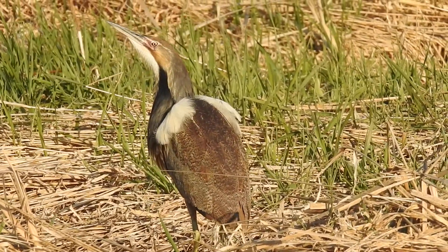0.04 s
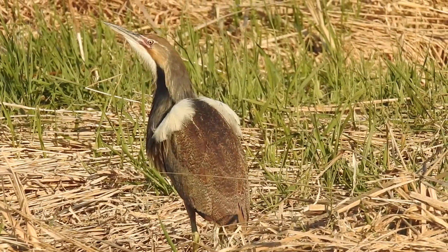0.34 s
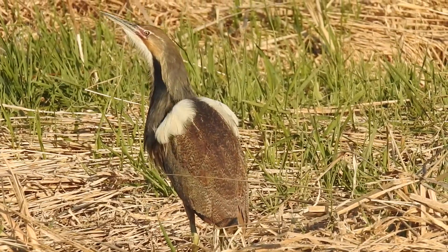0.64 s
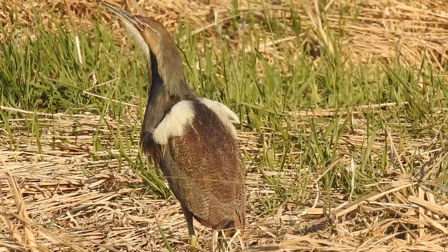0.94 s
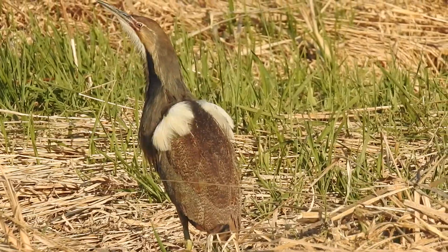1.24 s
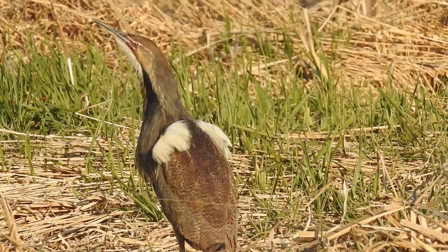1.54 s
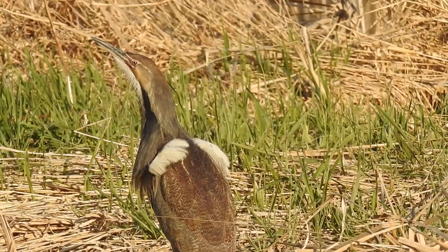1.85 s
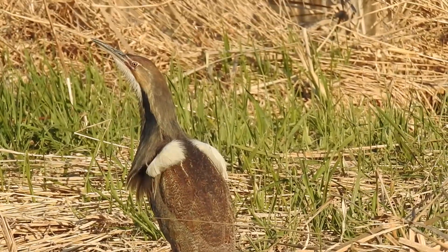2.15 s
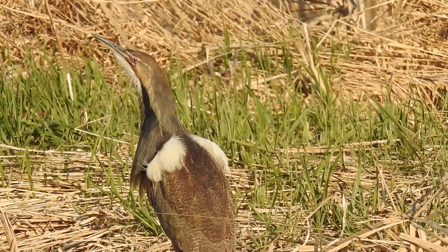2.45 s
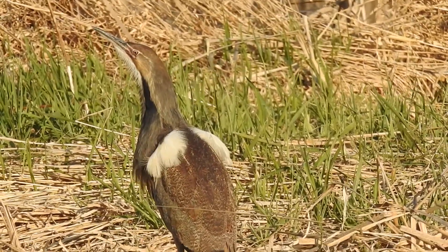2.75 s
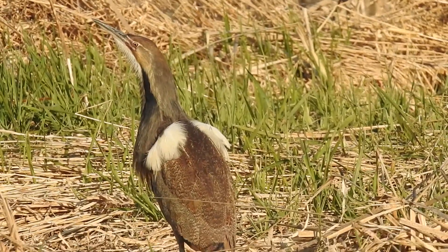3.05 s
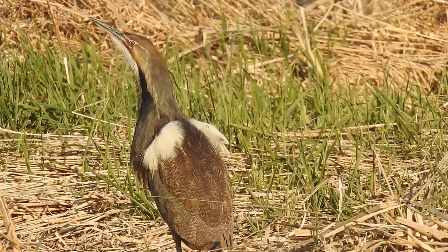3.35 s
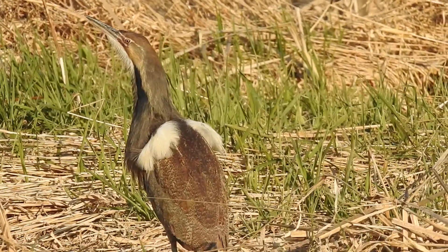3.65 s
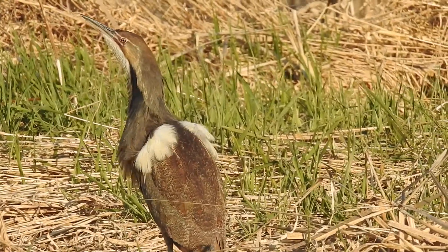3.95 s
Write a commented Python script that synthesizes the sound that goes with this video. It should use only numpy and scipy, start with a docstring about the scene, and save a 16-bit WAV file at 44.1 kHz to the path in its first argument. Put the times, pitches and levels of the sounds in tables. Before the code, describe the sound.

Many small birds chirping and twittering in a marsh, with low gusts of wind.

```python
"""A marsh full of small birds on a breezy day, heard through a stereo microphone.
In the first second wind buffets the microphone. From the outset whistles, chips, buzzes and nasal yelps
overlap above a distant chorus, soon joined by rising chirps: tones of the syrinx, scattered by reeds.
A faint far call throbs early on and again past halfway, when a soft knock sounds; a brief gust follows.
At the end one near bird starts a harsh trill, sounding both sides of its syrinx at once."""
import sys
import numpy as np
from scipy import signal
from scipy.fft import rfft, irfft
from scipy.io import wavfile

SR = 44100
rng = np.random.default_rng(int(sys.argv[2]) if len(sys.argv) > 2 else 0)


def file_out(sig):
    """Save sig as 16-bit WAV at sys.argv[1]."""
    # one column per channel
    cols = np.atleast_2d(sig).T
    # limit, then scale
    lim = np.clip(cols, -1, 1)
    pcm = np.round(lim * 32767).astype(np.int16)
    wavfile.write(sys.argv[1], SR, pcm)


N = 176400


def syrinx(hz, waver, edge=.22, flutter_db=2, waver_per_s=350):
    """Self-sustained oscillation: a near-sine, slightly unsteady in frequency and amplitude."""
    n = len(hz)
    u = np.linspace(0, 1, n)
    envelope = np.sin(np.pi / 2 * np.clip(np.minimum(u, 1 - u) / edge, 0, 1))
    cycles = np.cumsum(hz * (1 + waver * drift(n, waver_per_s))) / SR
    flutter = amp(flutter_db * drift(n, waver_per_s / 2))
    return np.sqrt(2) * envelope * flutter * np.sin(2 * np.pi * cycles)


def slur(length, start_hz, end_hz):
    """Frequency glide: the pitch moves fast at first, then more slowly."""
    done_halfway = .62 if end_hz > start_hz else .56
    return arc(length, start_hz, start_hz + done_halfway * (end_hz - start_hz), end_hz)


def perched_notes(table, waver, wet_db, apart, flutter_db, edge):
    """Superposition: glides come from four perches, each with its own echo paths."""
    perches = np.zeros((4, N))
    for k, (s, length, start, end, db) in enumerate(table):
        add(perches[k % 4], s, amp(db) * syrinx(slur(length, start, end), waver, edge, flutter_db))
    return sum(reeds(x, wet_db, apart) for x in perches)


# Slurred whistles: (time [s], length [s], start [Hz], end [Hz], relative level [dB])
WHISTLE_NOTES = [(0, 0.073, 3430, 3140, -40), (.12, .12, 2932, 2580, -37.5),
                 (.318, 0.026, 4890, 4930, -36.5), (.375, 0.075, 4250, 4220, -43),
                 (.47, .12, 3604, 3165, -40), (.615, 0.1, 2956, 2470, -39), (.87, 0.031, 6380, 6030, -33),
                 (.92, 0.047, 3390, 3110, -41.5), (1.135, .11, 2730, 2550, -50),
                 (1.365, 0.03, 4510, 4580, -38), (1.7, 0.03, 4160, 3974, -38),
                 (2.52, 0.058, 4990, 3860, -35.5), (3.738, 0.028, 5280, 5380, -37.5),
                 (3.92, 0.066, 2754, 2047, -59)]

def whistles():
    """Slow frequency glides: nearly pure tones, most of them falling."""
    return amp(-1.5) * perched_notes(WHISTLE_NOTES, .0071, wet_db=-4.5, apart=.45, flutter_db=2, edge=.15)


# Rising chirps: (time [s], length [s], top [Hz], level [dB])
CHIRP_NOTES = [(.73, 0.046, 5420, -40.5), (1.637, 0.018, 5000, -34.5), (1.756, 0.021, 5080, -36.5),
               (1.935, 0.037, 5060, -39.5), (2.087, 0.045, 4820, -34.5), (2.216, 0.045, 4770, -40),
               (2.301, 0.069, 4610, -42.5), (2.428, 0.071, 4780, -42), (3.013, 0.047, 5860, -39),
               (3.338, 0.068, 4170, -38)]

def chirps(sweep_hz=1350, rise_s=.0065):
    """Exponential approach: one bird's pitch sweeps up and holds its top note."""
    out = np.zeros(N)
    for s, length, top, db in CHIRP_NOTES:
        hz = top - sweep_hz * np.exp(-np.arange(0, length, 1 / SR) / rise_s)
        add(out, s, amp(db) * syrinx(hz, .013, edge=.25, flutter_db=3))
    return reeds(out, wet_db=-2)


# Quick chips: (time [s], length [s], start [Hz], end [Hz], relative level [dB])
CHIP_NOTES = [(0.298, 0.011, 5050, 6500, -35), (0.348, 0.015, 6910, 4740, -34.5),
              (0.832, 0.042, 6230, 4180, -35), (0.843, 0.035, 4820, 3150, -38.5),
              (1.088, 0.017, 5530, 6830, -36.5), (1.233, 0.016, 5110, 6660, -31),
              (1.236, 0.013, 7970, 5380, -33), (1.46, 0.011, 5580, 6930, -34.5),
              (1.485, 0.045, 6500, 7950, -45), (1.612, 0.022, 8000, 5400, -35),
              (1.822, 0.0081, 7500, 6500, -41), (2.0, 0.017, 7100, 5870, -38.5),
              (2.075, 0.011, 3710, 5590, -36.5), (2.2, 0.016, 5800, 6330, -37.5),
              (2.298, 0.01, 5040, 5580, -34.5), (2.358, 0.049, 6150, 6100, -42),
              (2.898, 0.0089, 5870, 6340, -39.5), (3.012, 0.024, 5550, 7000, -42),
              (3.173, 0.011, 7120, 4230, -34), (3.232, 0.02, 5360, 6870, -34),
              (3.246, 0.0045, 6350, 5720, -24), (3.261, 0.016, 6700, 3920, -28.5),
              (3.68, 0.058, 7620, 5530, -41.5), (3.753, 0.0022, 3400, 3570, -24),
              (3.762, 0.0023, 3740, 4060, -26), (3.7715, 0.0022, 4990, 4020, -21.5)]

def chips():
    """Time-bandwidth trade-off: brief, steep glides spread over a wide band."""
    return amp(-3) * perched_notes(CHIP_NOTES, .0232, wet_db=2, apart=1, flutter_db=4, edge=.22)


# Buzzy notes: (time [s], length [s], carrier [Hz], swing [Hz], swing rate [Hz], relative level [dB])
BUZZ_NOTES = [(0.135, 0.13, 5160, 950, 67, -43.5), (0.398, 0.096, 6100, 310, 73, -38),
              (0.529, 0.033, 4710, 630, 123, -36), (0.991, 0.042, 4530, 503, 130, -36.5),
              (1.247, 0.036, 6100, 348, 92, -39), (1.304, 0.035, 4370, 670, 114, -37),
              (1.668, 0.035, 5050, 410, 89, -35.5), (1.725, 0.04, 5100, 510, 110, -38),
              (1.91, 0.022, 4430, 1095, 85, -40.5), (2.009, 0.051, 5180, 920, 90, -37.5),
              (2.112, 0.036, 3926, 710, 111, -38.5), (2.325, 0.027, 5350, 1170, 73, -39.5),
              (2.448, 0.03, 5200, 302, 127, -36.5), (2.476, 0.026, 3745, 484, 104, -38.5),
              (2.792, 0.068, 5056, 277, 135, -32.5), (3.59, 0.044, 5870, 497, 126, -41.5)]

def buzzes():
    """Frequency modulation: about a hundred pitch swings a second give rough sidebands."""
    out = np.zeros(N)
    for s, length, carrier, swing, rate, db in BUZZ_NOTES:
        phase = 2 * np.pi * rate * np.arange(0, length, 1 / SR)
        hz = carrier + swing * np.sin(phase + .5 * np.sin(phase))
        add(out, s, amp(db) * syrinx(hz, waver=.053 * swing / 1000, edge=.4))
    return amp(-3) * reeds(out, wet_db=4.5, apart=.28)


# Nasal yelps: (time [s], length [s], top of the fourth harmonic [Hz], relative level [dB])
YELP_NOTES = [(.01, 0.051, 2796, -45), (0.315, 0.055, 2797, -46.5), (0.8, 0.038, 2747, -46),
              (0.87, 0.035, 2955, -43), (0.969, 0.048, 2980, -40.5), (1.034, 0.087, 2980, -41.5),
              (1.311, 0.041, 2772, -44), (1.402, 0.057, 2790, -46), (1.523, .04, 2820, -49),
              (1.578, 0.06, 2974, -44), (1.761, 0.07, 2840, -45.5), (1.899, 0.048, 2880, -45),
              (1.985, 0.076, 2858, -45.5), (2.11, .04, 2816, -51), (2.32, .045, 2970, -44.5),
              (2.651, 0.049, 2903, -41), (2.694, 0.019, 2666, -43), (2.753, 0.052, 2710, -44.5),
              (2.813, 0.046, 2813, -43.5), (2.906, .045, 2690, -45.5), (2.958, 0.04, 2870, -46),
              (3.071, 0.037, 2932, -41), (3.116, 0.073, 2823, -45), (3.167, 0.042, 2900, -44),
              (3.343, 0.063, 2885, -50.5), (3.475, 0.043, 2942, -38.5), (3.513, 0.055, 2883, -48.5),
              (3.716, 0.037, 2850, -42)]
# Throat response, with gaps between the harmonics: (frequency [Hz], gain [dB])
THROAT_RESPONSE = [(2450, -3.5), (2800, 3.5), (3060, -13.5), (3380, 10.5), (3740, -26.5), (4050, -3)]

def yelps(harmonics_db=(-15.5, 3, -4.5, -8), uneven_db=4):
    """Source and filter: harmonics 3 to 6 of a rising, missing fundamental pass through the throat."""
    source = np.zeros(N)
    chances = rng.uniform(-.963, 1, (len(YELP_NOTES), 5))
    for (s, length, top, db), chance in zip(YELP_NOTES, chances):
        rise = .1 * (1 + .5 * chance[-1])
        fundamental = slur(length, top * (1 - rise), top) / 4
        for k, harmonic_db in enumerate(harmonics_db):
            gain = amp(db - 5.5 + harmonic_db + uneven_db * chance[k])
            add(source, s, gain * syrinx(fundamental * (k + 3), .013))
    return reeds(irfft(rfft(source) * amp(per_bin(THROAT_RESPONSE)), N), wet_db=0)


def trill(start_s=3.784, period_s=.0207, slowing_s=.00012, pulse_s=.0175, shake_hz=450, shakes_per_s=260):
    """Biphonation: in each pulse one side of the syrinx dips in pitch while the other arches and shakes."""
    lows, highs = np.zeros((2, N))
    for k, (detune, size, phase) in enumerate(rng.standard_normal((10, 3))):
        s = start_s + k * (period_s + k * slowing_s)
        low_db = -28 - 5.5 * np.exp(-k / 2) + .5 * size  # swells over the first pulses
        low_hz = arc(pulse_s, 3020, 2835, 2830) * (1 + .01 * detune)
        shake = np.sin(2 * np.pi * (shakes_per_s * np.arange(len(low_hz)) / SR + phase))
        high_hz = arc(pulse_s, 3600, 4750, 3600) + shake_hz * shake
        add(lows, s, amp(low_db) * syrinx(low_hz, .01, edge=.42, flutter_db=1.2, waver_per_s=900))
        add(highs, s, amp(-38.5) * syrinx(high_hz, .05, edge=.45, flutter_db=4, waver_per_s=1500))
    return reeds(lows, wet_db=-12) + reeds(highs, wet_db=-1)


# Gusts on the microphone: (time [s], level [dB])
GUST_LEVELS = [(0, -34.5), (.05, -29.5), (.1, -49.5), (0.171, -32), (.22, -61), (.33, -56), (.45, -38.5),
               (.53, -41.5), (.67, -28), (.75, -38), (.86, -30), (.98, -53), (1.1, -37.5), (1.19, -51),
               (1.5, -59), (2.14, -52), (2.25, -87), (3.02, -52.5), (3.111, -32), (3.16, -57)]
# Wind spectrum: (frequency [Hz], relative level [dB])
WIND_SPECTRUM = [(20, -25), (45, -2), (100, 2), (190, -14.5), (330, -62), (900, -82)]

def wind():
    """Turbulent pressure: low noise, uncorrelated at the two ports and stronger on the left."""
    level_db = np.interp(np.arange(N) / SR, *np.transpose(GUST_LEVELS)) + drift(N, 45)
    return amp(level_db) * colour(rng.standard_normal((2, N)), WIND_SPECTRUM) * amp([[1.6], [-1.6]])


def knock(peak_s=2.671, hz=183, width_s=.0061):
    """A transient: a soft low tone and a little scuff rise and decay exponentially."""
    t = np.arange(N) / SR - peak_s
    tone = amp(-31.5) * np.cos(2 * np.pi * hz * t)
    scuff = amp(-41.5) * colour(rng.standard_normal(N), [(1000, 0), (2500, -30), (8000, -60)])
    return np.exp(-abs(t) / width_s) * (tone + scuff)


# Low, distant whistles: (time [s], length [s], start [Hz], end [Hz], direct level [dB])
FAR_WHISTLE_NOTES = [(1.27, 0.078, 2360, 1885, -60.5), (2.985, 0.088, 2110, 1760, -57),
                     (3.385, 0.11, 2218, 2006, -52), (3.5, 0.04, 1773, 1864, -49),
                     (3.555, 0.039, 1510, 1525, -54.5), (3.716, .014, 1600, 1480, -48),
                     (3.86, 0.054, 2185, 2055, -54.5)]

def far_whistles():
    """Beyond the critical distance: a far bird's echo outweighs its direct sound."""
    return perched_notes(FAR_WHISTLE_NOTES, .03, wet_db=4, apart=.4, flutter_db=4, edge=.25)


# Spectrum of the distant chorus: (frequency [Hz], relative level [dB])
CHORUS_SPECTRUM = [(1700, 9.5), (2400, -15.5), (2750, -0.5), (3050, -1), (4200, 0.5), (6300, -7),
                   (7500, -11)]

def chorus(notes_per_s=160, spread_db=8, max_glide=.159):
    """Incoherent summation: random short slurs of many far birds merge, mostly as echo."""
    out = np.zeros(N)
    for when, pitch, length, slope, size in rng.random((int(notes_per_s * N / SR), 5)):
        start_hz = 2200 * 3.3 ** pitch
        end_hz = start_hz * (1 + max_glide * (2 * slope - 1))
        hz = slur(.012 + .04 * length, start_hz, end_hz)
        add(out, when * N / SR, amp(spread_db * size) * syrinx(hz, .0232))
    return amp(-45.5) * colour(reeds(out, wet_db=4.5), CHORUS_SPECTRUM)


# Faint drawn-out calls: (time [s], length [s])
FAR_CALL_SPANS = [(0.279, 0.57), (2.448, 0.55)]

def far_calls(hz=1176, throbs_per_s=11):
    """Amplitude modulation: a far-off level tone and the rasp around it throb together."""
    out = np.zeros(N)
    rasp = colour(rng.standard_normal(N), [(250, -25), (600, -2), (1250, 0), (1800, -25)])
    for s, length in FAR_CALL_SPANS:
        t = np.arange(0, length, 1 / SR)
        tone = syrinx(np.full(len(t), hz), .022, edge=.05, waver_per_s=120)
        throb = 1 + .5 * np.sin(2 * np.pi * throbs_per_s * t)
        add(out, s, throb * (amp(-64) * tone + amp(-62.5) * rasp[:len(t)]))
    return reeds(out, wet_db=0)


# Outdoor background: (frequency [Hz], relative level [dB])
AIR_SPECTRUM = [(25, -10.5), (70, -1), (170, -1.5), (320, -15.5), (460, -12.5), (1600, -21), (6500, -17),
                (9500, -29), (15500, -39.5)]

def air():
    """Partial coherence: distant rumble and hiss, alike in both channels only in the middle range."""
    coherence = per_bin([(100, .3), (400, .8), (2500, .85), (9000, 0)])
    left, independent = rfft(rng.standard_normal((2, N)))
    right = coherence * left + np.sqrt(1 - coherence ** 2) * independent
    pair = irfft(np.array([left, right]), N)
    return amp(-49.5 + .8 * drift(N, 12)) * colour(pair, AIR_SPECTRUM)


def reeds(x, wet_db, apart=.45, early_share=.78, early_s=.01, t60_s=.45):
    """Multiple scattering: direct sound, quick echoes from the reeds and a longer tail."""
    t = np.arange(SR // 2) / SR
    taps = rng.standard_normal((3, len(t))) * (rng.random((3, len(t))) < .1)
    stereo_taps = taps[0] + apart * taps[1:]  # shared echoes plus each side's own
    early = np.sqrt(early_share) * unit(np.exp(-t / early_s))
    late = np.sqrt(1 - early_share) * unit(amp(-60 * t / t60_s))
    response = stereo_taps * (early + late) * np.minimum(t / .005, 1)
    response /= np.linalg.norm(response, axis=1, keepdims=True)
    return x + amp(wet_db) * signal.fftconvolve(x[None], response, axes=1)[:, :N]


# Phase between the ports: (frequency [Hz], lead of the left [rad])
PORT_PHASE = [(2800, 0.09), (4200, 1.09), (5000, 1.74), (5900, 2), (6500, 6), (8000, 2)]
# Level between the ports: (frequency [Hz], left minus right [dB])
PORT_LEVEL = [(1800, 2), (2750, 3.5), (4500, 0), (6200, 6)]

def ports(x):
    """Directional cues: the two microphone ports differ in phase and level, chiefly in the treble."""
    half = np.array([[.5], [-.5]])
    response = amp(half * per_bin(PORT_LEVEL)) * np.exp(1j * half * per_bin(PORT_PHASE))
    return irfft(rfft(x) * response, N)


def amp(db):
    """Decibels to amplitude ratio."""
    return 10 ** (np.asarray(db) / 20)


def unit(x):
    """Normalisation to rms 1."""
    return x / np.sqrt(np.mean(x ** 2) + 1e-20)


def per_bin(points):
    """Log-frequency interpolation of (frequency [Hz], value) at every FFT bin."""
    hz, value = np.transpose(points)
    return np.interp(np.log(np.fft.rfftfreq(N, 1 / SR) + 1), np.log(hz + 1), value)


def colour(x, points):
    """Spectral shaping by (frequency [Hz], gain [dB]), scaled to rms 1."""
    return unit(irfft(rfft(x) * amp(per_bin(points)), N))


def add(mix, s, sound):
    """Superposition of a sound at time s."""
    part = mix[max(round(s * SR), 0):][:len(sound)]
    part += sound[:len(part)]


def drift(count, per_s):
    """Slow fluctuation: random values joined by straight lines."""
    knots = rng.standard_normal(2048)
    return np.interp(np.arange(count) * per_s / SR, np.arange(len(knots)), knots)


def arc(length, start_hz, middle_hz, end_hz):
    """Parabolic pitch contour through three points."""
    u = np.linspace(0, 1, max(int(length * SR), 2))
    return np.polyval(np.polyfit([0, .5, 1], [start_hz, middle_hz, end_hz], 2), u)


def scene():
    """Superposition of birds, wind, air and knock; the trilling bird sits straight ahead."""
    birds = whistles() + far_whistles() + chirps() + chips() + buzzes() + yelps() + chorus() + far_calls()
    return ports(birds) + trill() + wind() + air() + knock()


def record(dry):
    """Band limiting: a linear-phase low-pass at 15750 Hz."""
    lowpass = signal.firwin(511, 15750, window=("kaiser", 9), fs=SR)
    return signal.oaconvolve(dry, lowpass[None], "same")


dry = scene()
out = record(dry)
file_out(out)
```